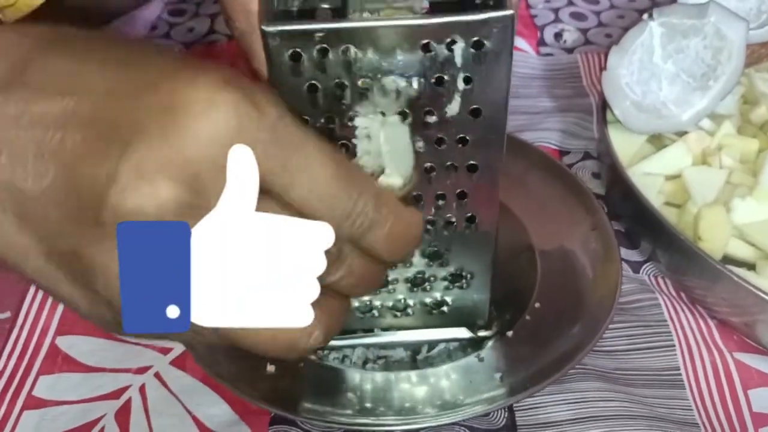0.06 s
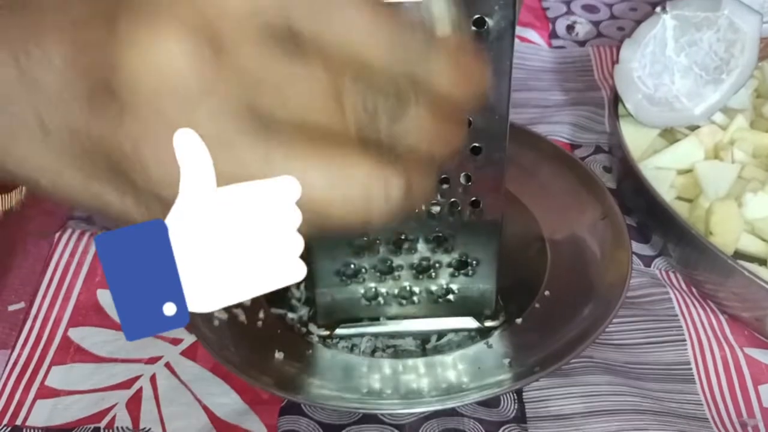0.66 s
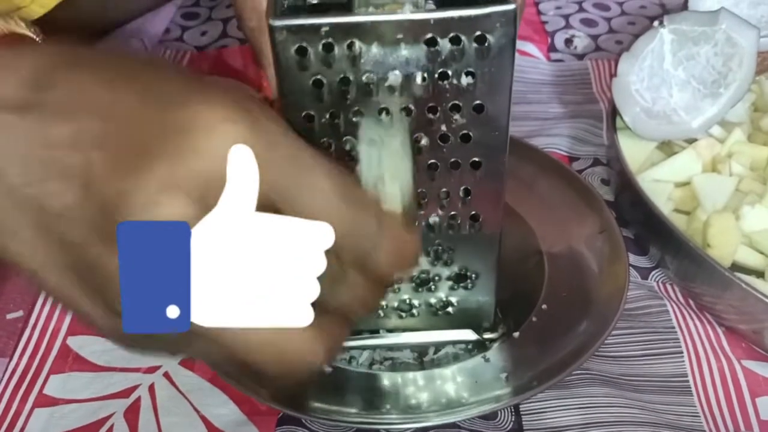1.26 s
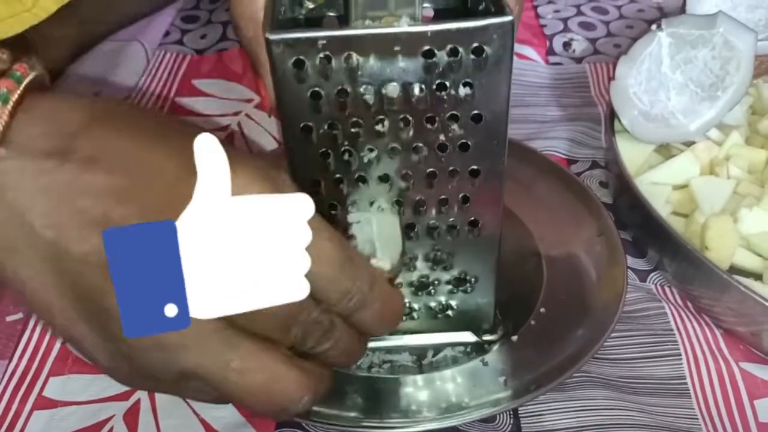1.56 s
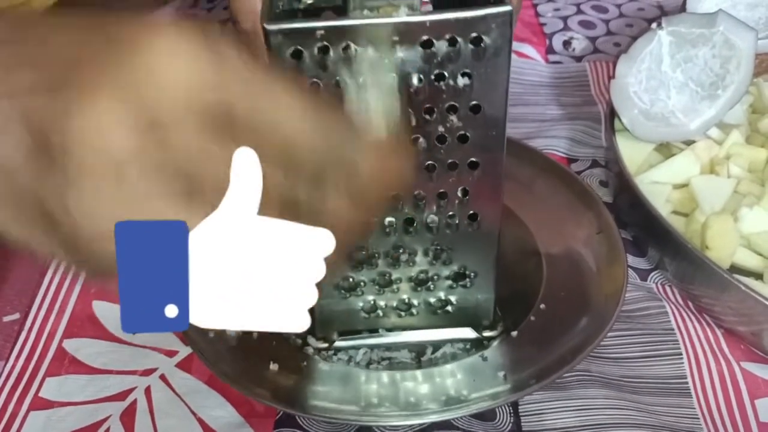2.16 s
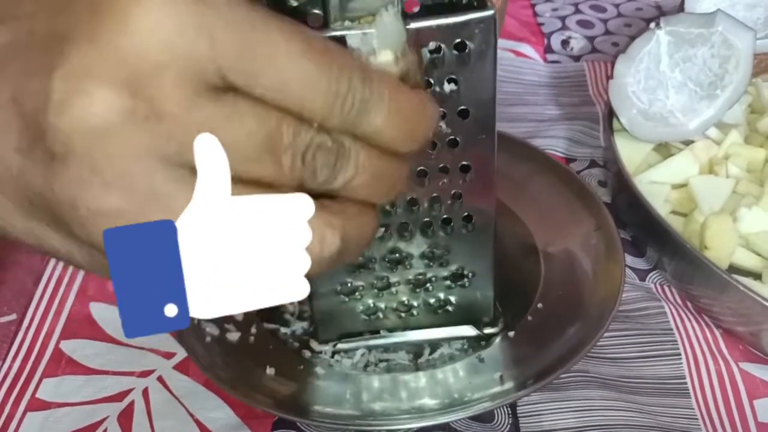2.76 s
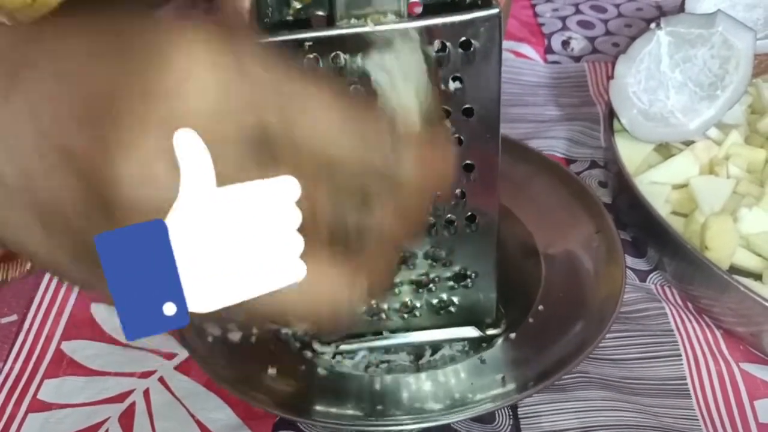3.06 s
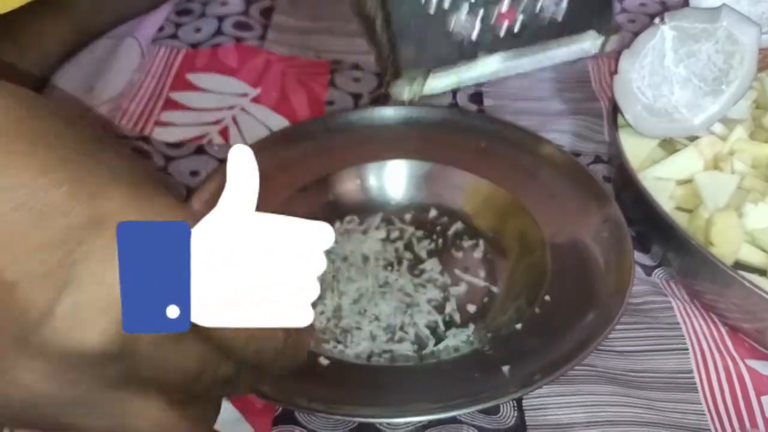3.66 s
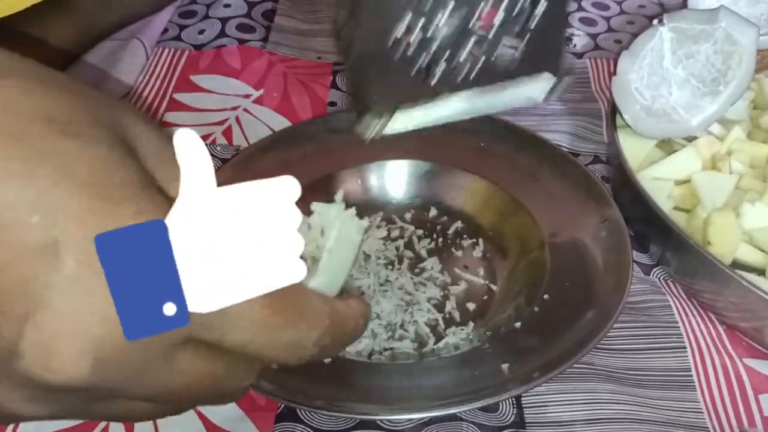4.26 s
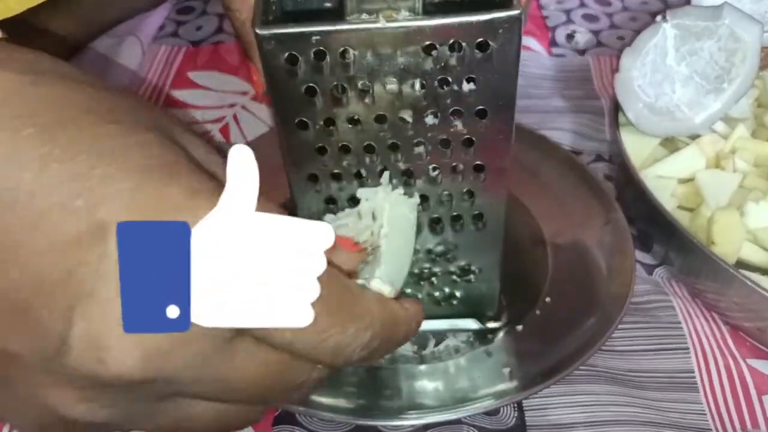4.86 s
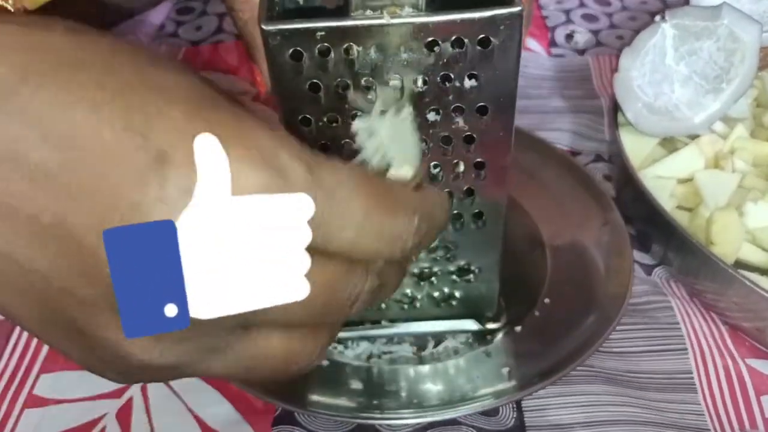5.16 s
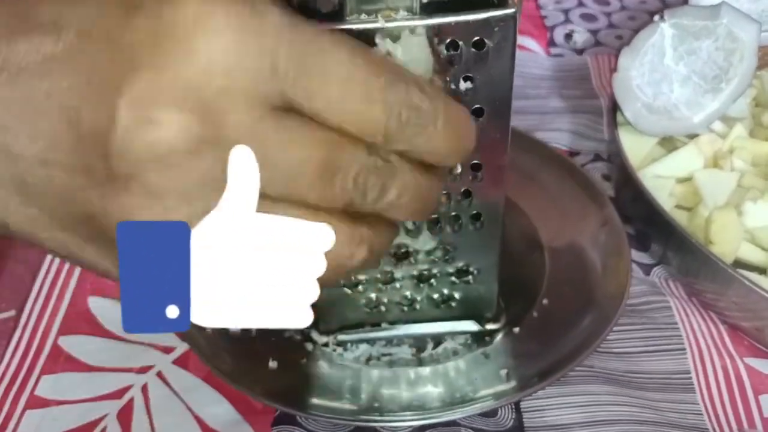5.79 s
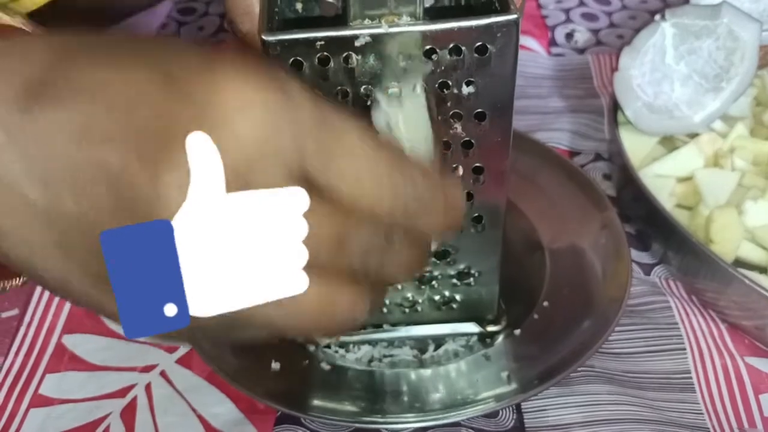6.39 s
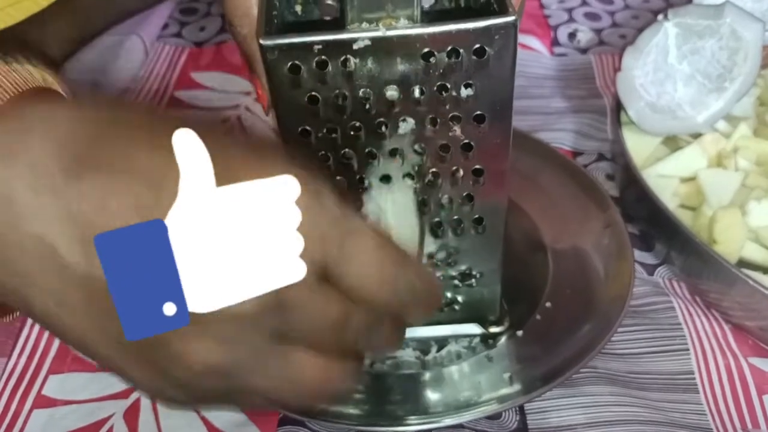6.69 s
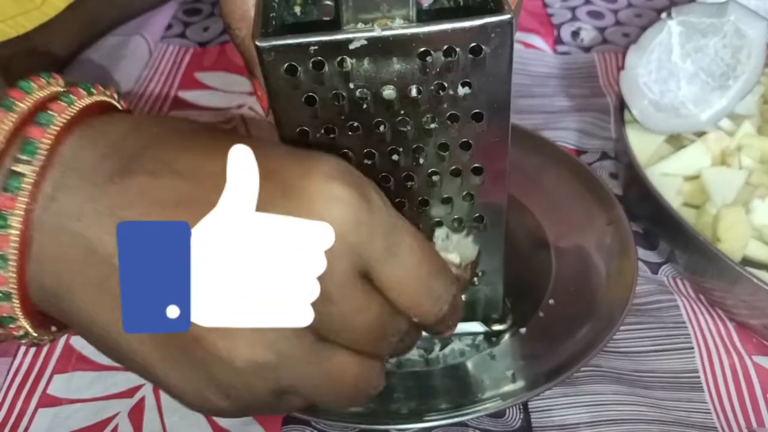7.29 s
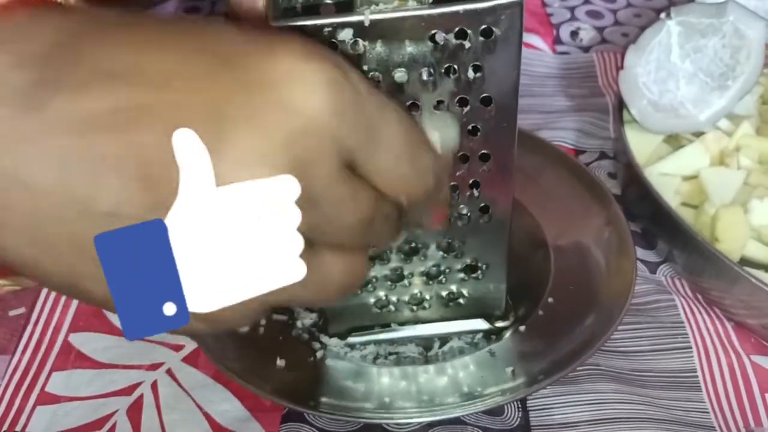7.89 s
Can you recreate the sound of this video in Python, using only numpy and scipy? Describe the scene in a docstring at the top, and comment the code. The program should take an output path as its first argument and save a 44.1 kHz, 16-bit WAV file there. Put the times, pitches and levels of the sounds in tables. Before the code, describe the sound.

Rhythmic grating on a steel box grater with clicking glass bangles, broken by a short lull and a clank against a steel plate.

```python
"""A vegetable is rubbed up and down a steel box grater that stands in a steel plate on a cloth.
Each stroke tears hundreds of tiny bits on the teeth, which ring the steel sheet and drum the box.
Glass bangles click on the wrist. Halfway, the grater is lifted and set back with a clank, and then
the grating goes on. Behind it is a quiet kitchen with a soft rush and the hum of a distant motor."""
import sys
import numpy as np
from scipy import signal
from scipy.fft import rfft, irfft
from scipy.io import wavfile
from scipy.ndimage import uniform_filter1d, map_coordinates

SR = 44100
rng = np.random.default_rng(int(sys.argv[2]) if len(sys.argv) > 2 else 0)


def write(x):
    x = np.atleast_2d(x).T
    wavfile.write(sys.argv[1], SR, np.round(np.clip(x, -1, 1) * 32767).astype(np.int16))

N = 354563
TIME = np.arange(N) / SR

# Levels in the tables are relative: each layer gets its overall volume later.
# How loud the room is. Each row: time in seconds, level in dB.
ROOM_LEVELS = [(0, -51), (3.5, -52), (5.6, -52), (7, -60.5), (7.6, -58.5), (8.04, -56)]
# The motor's tones. Each row: multiple of its turning rate, level in dB.
MOTOR_TONES = [(2, -69), (3, -63), (6, -62.5), (9, -73.5), (12, -73), (15, -74)]
# The grater sliding off the plate. Each row: time in seconds, level in dB.
LIFT_LEVELS = [(3.2, -80), (3.23, -49.5), (3.38, -47.5), (3.45, -53), (3.53, -54), (3.62, -56.5),
               (3.72, -71)]
# Its rim hitting the plate. Each row: time in seconds, level in dB, dB added for the thud.
RIM_KNOCKS = [(4.7319, -17.5, -23), (4.7348, -13, -8), (4.740, -22, -17), (4.7883, -18, -19),
              (4.7989, -26.5, 3), (4.806, -23, -12), (5.0201, -27.5, -26), (5.063, -45, -6)]
# Ringing of plate and grater. Each row: pitch in Hz, level in dB, seconds to fade by 60 dB.
STEEL_TONES = [(2252, -8, .24), (2350, -9, .22), (2579, -7, .2), (2835, -7, .18), (3101, -8, .14),
               (3660, -6, .15), (4204, -2, .24), (4645, 2, .19), (4782, -1, .18), (5042, -8, .23),
               (5330, -6, .14), (5455, -5, .18), (5792, -4, .22), (6045, -3, .2), (6290, -5, .17),
               (6440, -4, .17), (6895, -8, .16), (7990, -12, .18), (8603, -13, .16)]
# Clear bangle clicks. Each row: time in seconds, level in dB, dB added for the high sparkle.
BANGLE_CLICKS = [(0.1018, -15, 3.5), (1.111, -12.5, 0), (1.1434, -20, 3), (1.3435, -21.5, -6),
                 (1.601, -13, -10), (1.6912, -17.5, -1), (1.874, -12.5, -8.5), (2.001, -17, -1.5),
                 (2.1526, -17, 0.5), (2.401, -20.5, 0), (2.5487, -21, -2), (2.5776, -13.5, -2),
                 (2.9608, -18.5, -0.5), (3.0296, -18, -2.5), (3.1848, -9, 0), (3.239, -23.5, -4),
                 (3.3045, -18.5, -14), (3.5474, -15.5, 1), (3.5995, -17.5, -2), (5.267, -33, -2),
                 (5.823, -21.5, -1.5), (6.2702, -22.5, -10), (6.5641, -22, -8), (6.6499, -22, 1),
                 (7.1233, -15.5, -11), (7.6486, -11, -4), (7.6676, -13.5, -1.5), (7.6717, -17, 1.5),
                 (7.7534, -16, 0.5), (7.8372, -12.5, -3.5), (7.8716, -13.5, -4)]
# Dull ticks that come with some clicks. Each row: time in seconds, level in dB.
DULL_TICKS = [(2.401, -32), (3.6, -25), (7.6488, -26), (7.8373, -24.5)]
# Strokes, down and up in turn. Each row: start of the full bite in seconds, length in seconds, level in dB.
GRATER_STROKES = [(-0.002, 0.017, -24.5), (0.136, 0.044, -35.5), (0.259, 0.025, -23), (0.368, 0.047, -33.5),
                  (0.497, 0.019, -25), (0.624, 0.037, -37.5), (0.739, 0.059, -24.5), (0.867, 0.049, -32.5),
                  (0.998, 0.014, -24), (1.134, 0.056, -34.5), (1.243, 0.045, -23), (1.387, 0.047, -34),
                  (1.501, 0.07, -25), (1.665, 0.021, -25.5), (1.768, 0.049, -26), (1.913, 0.043, -31.5),
                  (2.012, 0.036, -28), (2.185, 0.0085, -29), (2.284, 0.042, -20.5), (2.446, 0.022, -31.5),
                  (2.545, 0.053, -28.5), (2.712, 0.0096, -25), (2.812, 0.048, -24.5), (2.968, 0.05, -35),
                  (3.079, 0.049, -22), (3.334, 0.017, -38.5), (5.608, 0.05, -43.5), (5.733, 0.056, -45),
                  (5.866, 0.048, -30.5), (6.015, 0.049, -37), (6.14, 0.065, -29), (6.292, 0.045, -37.5),
                  (6.414, 0.046, -30.5), (6.59, 0.012, -32.5), (6.683, 0.047, -23), (6.84, 0.035, -30.5),
                  (6.937, 0.066, -28), (7.128, 0.022, -44), (7.216, 0.034, -47), (7.396, 0.13, -39),
                  (7.84, 0.089, -39)]
# Teeth catching and tearing free. Each row: time in seconds, level in dB.
TOOTH_SNAGS = [(0.651, -27.5), (.719, -21.5), (1.003, -26.5), (1.128, -23.5), (1.553, -19.5), (1.759, -24),
               (2.041, -24.5), (2.287, -28), (2.591, -22), (6.586, -27), (6.987, -23.5), (7.445, -29)]
# Heavy pushes that thump into the table. Each row: time in seconds, level in dB.
HEAVY_PUSHES = [(0.0, -34.5), (.79, -52), (1.27, -38.5), (1.545, -36), (1.8, -44), (2.04, -49), (3.1, -49),
                (6.18, -53), (6.445, -44), (6.74, -46), (6.98, -34), (7.46, -49)]
# Resonances, the pitches a thing favours. Each row: pitch in Hz, width in Hz, boost in dB.
SHEET_RESONANCES = [(1140, 60, 5), (1390, 150, 9), (2870, 80, 5), (3170, 60, 4), (3715, 100, 7),
                    (4230, 120, 5), (4650, 60, 4), (4850, 110, 3), (5290, 200, 3), (6045, 90, 3),
                    (7416, 110, 3)]
BOX_RESONANCES = [(169.5, 24, 4.5), (225, 46, 5.5), (362, 33, 3.5), (510, 100, 3.5), (690, 36, 4),
                  (826, 86, 4), (1120, 33, 5.5), (1440, 210, 9)]
# The tone of each sound, from bass to treble. Each row: frequency in Hz, level in dB.
ROOM_SPECTRUM = [(25, -17), (60, -11), (92, -16), (130, -4.5), (160, -4), (200, 3), (260, -8), (400, -7.5),
                 (900, -15.5), (1600, -22), (3000, -20.5), (4700, -25), (6000, -15.5), (7500, -35.5),
                 (11500, -33.5), (15000, -39)]
CLANK_SPECTRUM = [(600, -31), (1900, -17.5), (2250, -3.5), (3200, -4.5), (4200, -2), (4700, -0.5),
                  (6400, -2), (7400, -7.5), (8600, -9), (9500, -24), (11000, -13.5), (15000, -22)]  # steel on steel
THUD_SPECTRUM = [(60, -14), (200, -4), (340, -13.5), (450, -4), (570, -0.5), (700, -3.5), (900, -19),
                 (2000, -30)]  # a knock through the cloth
CLICK_SPECTRUM = [(1500, -37), (3200, -21), (4500, -10), (5600, 0), (7000, -4), (8500, -6), (10000, -17),
                  (16000, -46)]  # glass on glass
SPARKLE_SPECTRUM = [(5000, -36), (9500, -14), (11200, -1), (12800, -4), (14200, -5), (16000, -29)]
TICK_SPECTRUM = [(100, -2), (400, -4), (1200, -9.5), (3000, -8), (6000, -6)]
RASP_SPECTRUM = [(300, -33.5), (1000, -26), (1700, -18), (2200, -9.5), (2900, -7.3), (4000, -3), (5400, -1),
                 (6200, -1.9), (7200, -10.5), (9700, -16), (12500, -13.5), (14500, -16), (16000, -37)]  # the sheet
DRUM_SPECTRUM = [(70, -21), (98, -18.5), (122, 1), (200, 0), (285, -8), (400, -7.5), (600, -8.5),
                 (1000, -12.5), (1250, -21.5), (2500, -22.5)]  # the box
THUMP_SPECTRUM = [(15, -23), (30, -16.5), (48, 1.5), (60, 3.5), (73, -15), (100, -24), (200, -36)]  # the table
# The shaded right microphone loses treble. Each row: frequency in Hz, dB compared with the left.
RIGHT_SHADE = [(100, 0), (400, 1.5), (1300, -0.5), (2500, -0.5), (4000, -1.5), (5500, -12), (8000, -12),
               (10000, -26), (11500, -24.5), (14000, -11.5)]


def undb(db):
    """Turn decibels into a number to multiply by."""
    return 10 ** (np.asarray(db) / 20)


def convolve(x, response):
    """Start a copy of the response at every sample of x, scaled by that sample."""
    return signal.fftconvolve(np.atleast_2d(x), np.atleast_2d(response), axes=1)[:, :N]


def colour(x, spectrum, resonances=(), keep_power=True, size=8192):
    """Filter a sound with a smooth spectrum that has resonances standing on it."""
    f = np.maximum(np.fft.rfftfreq(size, 1 / SR), 1)
    hz, db = np.transpose(spectrum)
    db = np.interp(np.log(f), np.log(hz), db) - 20 * np.log10(np.maximum(f / hz[-1], 1) ** 2)
    for centre, width, boost in resonances:
        db = db + boost / (1 + (2 * (f - centre) / width) ** 2)
    gain = undb(db)
    if keep_power:
        gain = gain / np.sqrt(np.mean(gain ** 2))
    # Make the filter ring only after a hit, never before it.
    cepstrum = irfft(np.log(gain))
    cepstrum[1:size // 2] *= 2
    cepstrum[size // 2 + 1:] = 0
    return convolve(x, irfft(np.exp(rfft(cepstrum))))


def noise(shared):
    """White noise, left and right, with this share of its power in common."""
    white = rng.standard_normal((3, N))
    return np.sqrt(shared) * white[0] + np.sqrt(1 - shared) * white[1:]


def fade(t60):
    """A loudness curve that falls by 60 dB in t60 seconds."""
    return np.exp(-np.log(1000) * TIME[:int(t60 * SR) + 2] / t60)


def impulses(times, sizes):
    """One spike for each event."""
    return np.bincount(np.clip(np.asarray(times) * SR, 0, N - 1).astype(int), sizes, N)


def bursts(times, db, t60):
    """A loudness curve that jumps at each event and dies away."""
    return np.sqrt(np.abs(convolve(impulses(times, undb(db) ** 2), fade(t60) ** 2)[0]))


def grain(per_second, t60, scatter_db=0.5):
    """A rough loudness curve made of tiny, uneven snaps at random moments."""
    chance = rng.random((int(per_second * N / SR), 2))
    sizes_db = scatter_db * np.minimum(-np.log(1 - chance[:, 1]), 4)
    envelope = bursts(chance[:, 0] * N / SR, sizes_db, t60)
    return envelope / np.sqrt(np.mean(envelope ** 2))


def steady(x, hold_s):
    """Even out the loudness of a rumble."""
    return x / np.sqrt(uniform_filter1d(x ** 2, int(hold_s * SR)) + 1e-12)


def room_noise(motor_hz=37.1, hum_waver_db=2.5):
    """A low, wavering rush, and the faint hum of a motor turning somewhere in the house."""
    def waver():
        """A slow, random drift."""
        return np.interp(TIME, np.linspace(0, N / SR, 100), rng.standard_normal(100))

    level_db = np.interp(TIME, *np.transpose(ROOM_LEVELS))
    centred = colour(noise(.97), [(20, 2.5), (700, -0.5), (1500, -6.5), (4000, -10), (16000, -25)],
                     keep_power=False)
    wide = colour(noise(0), [(20, -34), (300, -9), (1200, 0.5), (3000, 0.5), (16000, 1)],
                  keep_power=False)
    rush = colour(centred + wide, ROOM_SPECTRUM) * undb(level_db - 0.8 + 0.76 * waver())
    hum = np.zeros(N)
    for multiple, db in MOTOR_TONES:
        loudness = np.sqrt(2) * undb(db + hum_waver_db * waver())
        hum += loudness * np.sin(2 * np.pi * (multiple * motor_hz * TIME + rng.random()))
    return rush + hum * undb(level_db - level_db.max())


def kitchen_echo(x, t60, echo_db):
    """Add the soft, short echo of a furnished room."""
    decay = fade(t60)[:SR]
    tail = rng.standard_normal((SR, 2)).T[:, :len(decay)] * decay
    tail[:, :int(.004 * SR)] = 0  # the echo arrives a little late
    tail /= np.sqrt(np.sum(tail ** 2, axis=1, keepdims=True))
    spectrum = [(60, -8), (200, -11), (600, 0.5), (5000, -4), (9000, 4), (16000, 2)]
    return x + undb(echo_db) * colour(convolve(x, tail), spectrum, keep_power=False)


def lift_grater():
    """Steel slides lightly over steel and wakes the same tones as a knock."""
    rub = undb(np.interp(TIME, *np.transpose(LIFT_LEVELS))) * grain(per_second=1100, t60=0.011)
    return undb(2.5) * colour(noise(0.09) * rub, CLANK_SPECTRUM, [(hz, 70, 6) for hz, _, _ in STEEL_TONES])


def set_grater_down(split_hz=4100, dulling=0.41):
    """The rim lands in the plate and rocks, with a clash, a thud and ringing tones."""
    times, db, thud_db = np.transpose(RIM_KNOCKS)
    treble_db = db + dulling * (db - db.max())  # lighter knocks are duller

    def clash(levels_db, side):
        """Crack and shimmer of the steel, below or above split_hz."""
        crack = bursts(times, levels_db, t60=0.021)
        shimmer = undb(-10) * bursts(times, levels_db, t60=0.15)
        resonances = [(hz, 70, 5) for hz, _, _ in STEEL_TONES]
        steel = colour(noise(0.087) * np.hypot(crack, shimmer), CLANK_SPECTRUM, resonances)
        return signal.sosfilt(signal.butter(3, split_hz, side, fs=SR, output="sos"), steel)

    thud = colour(noise(0.93) * bursts(times, db + thud_db, t60=0.066), THUD_SPECTRUM)
    tones = np.zeros((2, N))
    for hz, tone_db, t60 in STEEL_TONES:
        decay = undb(tone_db) * fade(t60)
        phase = 2 * np.pi * rng.random((2, 1))  # each microphone faces another side of the steel
        tones[:, :len(decay)] += decay * np.sin(2 * np.pi * hz * TIME[:len(decay)] + phase)
    ring = convolve(impulses(times, undb(db)), tones)
    clank = undb(3.5) * clash(db, "low") + undb(4) * clash(treble_db, "high")
    return clank + undb(-7.5) * thud + undb(-18.5) * ring


def bangles():
    """Glass rings tap and chatter; the wrist damps them at once, leaving a faint high ring."""
    # Faint extra clicks come as the wrist turns, just before each stroke after the first.
    turns = np.array(GRATER_STROKES)[1:, 0]
    luck = rng.random((len(turns), 2))
    faint_times = turns - 0.032 * luck[:, 0]
    faint_db = -32.5 + 12.5 * (2 * luck[:, 1] - 1)
    faint_clicks = np.column_stack([faint_times, faint_db, np.full(len(turns), -4.5)])
    times, db, sparkle_db = np.vstack([BANGLE_CLICKS, faint_clicks]).T
    chance = rng.random((len(times), 4))
    bounce_times = (times[:, None] + 0.0051 + 0.045 * chance ** 2).ravel()

    def taps(levels_db, t60):
        """Each first touch and its four weak bounces."""
        bounces = bursts(bounce_times, (levels_db[:, None] - 20 - 8 * chance).ravel(), t60)
        return np.hypot(bursts(times, levels_db, t60), bounces)

    clicks = colour(noise(0.14) * taps(db, t60=0.01), CLICK_SPECTRUM)
    sparkle = colour(noise(0.094) * taps(db + sparkle_db, t60=0.012), SPARKLE_SPECTRUM)
    tick_times, tick_db = np.transpose(DULL_TICKS)
    ticks = colour(impulses(tick_times, undb(tick_db)), TICK_SPECTRUM) * undb([[12.5], [7.5]])
    ring = colour(noise(.1) * bursts(times, db + sparkle_db, t60=0.31), SPARKLE_SPECTRUM,
                  resonances=[(11360, 300, 8), (12800, 300, 4)])
    return undb(-1.45) * clicks + undb(-1.9) * sparkle + ticks + undb(-31.5) * ring


def tooth_rows(rate_hz, jitter, depth_db, t60):
    """Loudness pulses as the food bumps over one row of teeth after another."""
    chance = rng.standard_normal((int(2 * rate_hz * N / SR), 2))
    times = np.cumsum(np.exp(jitter * chance[:, 0])) / rate_hz
    inside = times < N / SR
    power = 1 + bursts(times[inside], depth_db + 2 * chance[inside, 1], t60) ** 2
    return np.sqrt(power / power.mean())


def pressure(levels_db, slide_db, linger):
    """Loudness of the strokes: the food slides in, bites, lets go and slides on; linger scales the fades."""
    bite_s, let_go_s, slide_in_s, slide_out_s = linger * np.array([.029, .041, .13, .16])  # per 20 dB
    power = np.zeros(N)
    for (start, length, _), db in zip(GRATER_STROKES, levels_db):
        near = slice(max(int((start - .2) * SR), 0), int((start + .5) * SR))
        t = TIME[near] - start
        before, after = np.maximum(-t, 0), np.maximum(t - length, 0)
        bite = undb(db - 20 * (before / bite_s + after / let_go_s))
        slide = undb(db + slide_db - 20 * (before / slide_in_s + after / slide_out_s))
        power[near] += bite ** 2 + slide ** 2
    return np.sqrt(power)


def wander(x, width_hz, depth_db=4.5, hold_s=.05, size=512):
    """The moving food wakes different resonances, so narrow bands of pitch swell and sink."""
    hz, times, bands = signal.stft(x, SR, nperseg=size)
    random_map = rng.standard_normal((600, 600))
    places = np.meshgrid(hz / width_hz, times / hold_s, indexing="ij")
    gain = undb(depth_db * map_coordinates(random_map, places, order=1, mode="wrap"))
    return signal.istft(bands * gain / np.sqrt(np.mean(gain ** 2)), SR, nperseg=size)[1][:, :N]


def grating(firm_db=-25, flick_s=0.019, set_down_s=4.73):
    """Tearing fibres ring the sheet, the same tugs drum the box, and heavy pushes thump the table."""
    start, length, db = np.transpose(GRATER_STROKES)
    rows = tooth_rows(rate_hz=65, jitter=.4, depth_db=6, t60=0.11)
    fibres = grain(per_second=6000, t60=0.0041)
    snags = uniform_filter1d(bursts(*np.transpose(TOOTH_SNAGS), t60=0.066), int(.003 * SR))
    pushes = uniform_filter1d(bursts(*np.transpose(HEAVY_PUSHES), t60=0.23), int(.035 * SR))

    drag = np.hypot(pressure(db, slide_db=-19.5, linger=0.88) * rows, undb(1.95) * snags)
    tearing = wander(noise(0.11) * drag * fibres, width_hz=130)
    rasp = colour(tearing, RASP_SPECTRUM, SHEET_RESONANCES)

    drum_db = db - 8.5 + 0.076 * (firm_db - db)  # light strokes keep a little more body
    drum_db -= 6 * np.maximum(1 - length / flick_s, 0)  # quick flicks drum less
    drum_db -= 2.5 * (start > set_down_s)  # so does the box once it is set back down
    rubbing = pressure(drum_db, slide_db=-17, linger=0.96) * rows
    tugs = np.sqrt(rubbing ** 2 + (undb(-10) * snags) ** 2 + (undb(-0.5) * pushes) ** 2)
    drum = colour(wander(noise(0.99) * tugs, width_hz=87.2), DRUM_SPECTRUM, BOX_RESONANCES)

    sway = pressure(db - 28.5, slide_db=-17, linger=1.5)  # the table rumbles under every stroke
    thump = steady(colour(noise(1), THUMP_SPECTRUM), hold_s=0.055) * np.hypot(pushes, sway)
    return undb(4.5) * rasp + undb(0.5) * drum + undb(6.5) * thump


def scene():
    """Grater, bangles and plate in the quiet kitchen."""
    sources = grating() + bangles() + lift_grater() + set_grater_down()
    return kitchen_echo(sources, t60=0.2, echo_db=-13) + room_noise()


def record(dry, top_hz=15600):
    """The right microphone is shaded, both hiss faintly, and the highest treble is cut."""
    right = colour(dry[1], RIGHT_SHADE, keep_power=False)[0]
    stereo = np.vstack([dry[0], right]) + undb(-72) * noise(0)
    return signal.sosfilt(signal.ellip(8, .2, 70, top_hz, fs=SR, output="sos"), stereo)


dry = scene()
out = record(dry)
write(out)
```